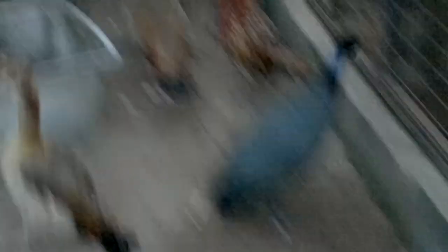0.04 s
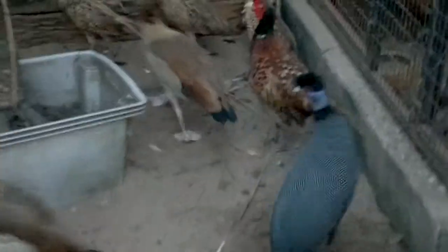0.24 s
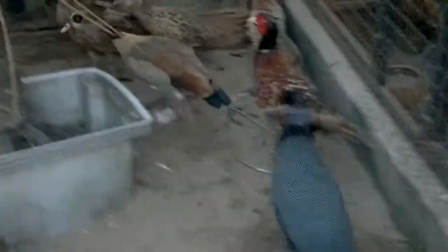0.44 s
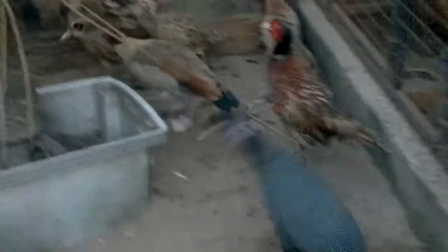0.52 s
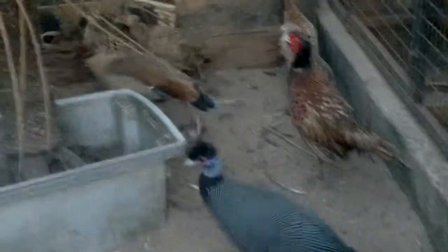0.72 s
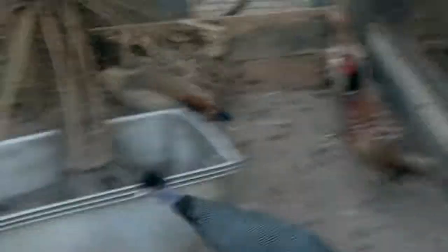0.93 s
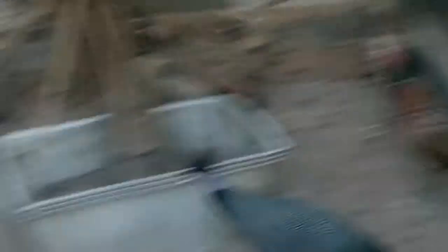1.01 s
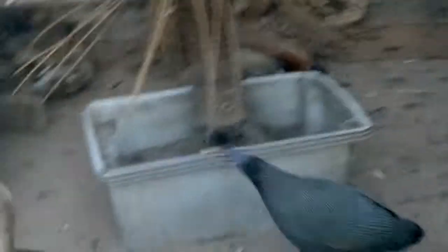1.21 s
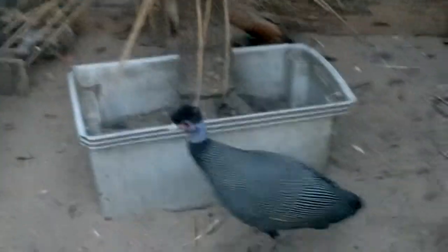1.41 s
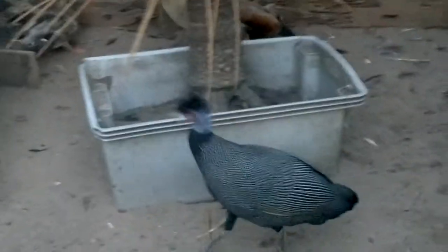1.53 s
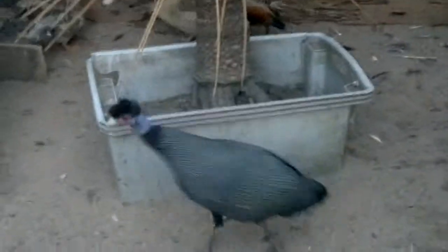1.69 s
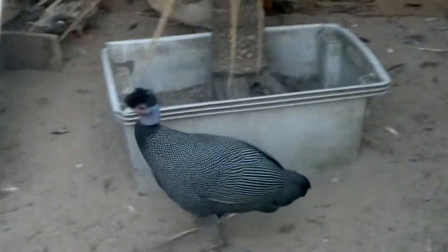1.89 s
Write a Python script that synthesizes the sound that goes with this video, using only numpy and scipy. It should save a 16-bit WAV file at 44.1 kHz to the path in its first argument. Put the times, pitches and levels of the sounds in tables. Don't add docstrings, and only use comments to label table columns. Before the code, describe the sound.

A fowl gives four harsh, buzzing squawks close on the right, with hoarse birds croaking between.

```python
import sys
import numpy as np
from scipy import signal
from scipy.fft import rfft, irfft
from scipy.io import wavfile
from scipy.ndimage import uniform_filter1d, map_coordinates

SR = 44100
rng = np.random.default_rng(int(sys.argv[2]) if len(sys.argv) > 2 else 0)


def unload_wav(signal):
    wavfile.write(
        sys.argv[1],
        SR,
        np.round(np.clip(np.atleast_2d(signal).T, -1, 1) * 32767).astype(np.int16),
    )


def volts_from_db(level):
    exponent = np.asarray(level, float) / 20
    return 10 ** exponent


N = 85995

# frequency in Hz, level in dB.
HOARSE_THROAT = [(900, -40), (1500, -12), (2100, -1), (3100, -1), (4150, 2), (6100, -8), (8000, -18),
                 (12000, -46)]


def unit(x):
    return x / np.sqrt(np.mean(x ** 2) + 1e-20)


def along(points, hz):
    f, v = np.transpose(points)
    return np.interp(np.log(hz + 1), np.log(f + 1), v)


def wobble(rate, n=N):
    knots = rng.standard_normal(int(n * rate / SR) + 4)
    return map_coordinates(knots, [np.arange(n) * rate / SR])


def colour_noise(spectrum, n):
    return irfft(rfft(rng.standard_normal(n)) * volts_from_db(along(spectrum, np.fft.rfftfreq(n, 1 / SR))), n)


def voice(calls, throat, sag, arch, release_s, trill_hz, trill, pulse_db, jitter, half_db, half_grows_db,
          breath_db, count, swell_db=7.5, chop_depth=0.63, scatter_db=2.5, tires=False):
    bend = .6
    onset_s, chop_s = 0.0015, .0013
    out = np.zeros(N + 2 * SR)
    for s, length, db, hz, attack in calls:
        n = round(length * SR) + SR // 6
        t = np.arange(n) / SR
        u = np.minimum(t / length, 1.3)

        flutter_hz = trill_hz * (1 - tires * .2 * u + 0.075 * wobble(42.7, n))
        flutter = np.cumsum(flutter_hz) / SR % 1
        saw = uniform_filter1d(flutter ** bend - 1 / (1 + bend), size=90)

        glide = 1 - sag * u - arch * (2 * u - 1) ** 2
        ends = .025 * np.exp(-t / .006) + .03 * np.clip(10 * u - 9, 0, 1)
        f = hz * (glide + trill * saw * (1 - .45 * u) - tires * ends + jitter * wobble(354.1, n))
        phase = np.pi * np.cumsum(f) / SR

        swell = -swell_db * np.maximum(1 - t / attack, 0) ** 2.86
        effort_db = swell - 20 / np.log(10) * np.maximum(t - length, 0) / release_s
        dull_db = np.minimum(-0.9 * effort_db / 20, 3)

        split_db = half_db + half_grows_db * np.clip((u - .35) / .15, 0, 1)
        tone = np.zeros(n)
        for k in range(1, count):
            half = split_db + tires * (11.5 * s + 1.6 * k)
            level_db = along(throat, k * f / 2) + k % 2 * half - k * dull_db + scatter_db * wobble(154.7, n)
            tone += volts_from_db(level_db) * (k * f < SR * .7) * np.sin(k * phase + 7 * rng.random())
        tone /= np.std(tone[:round(length * SR)])
        breath = volts_from_db(breath_db - 1.7 * dull_db) * unit(colour_noise(throat, n))

        from_break_s = np.minimum(flutter, 1 - flutter) / trill_hz
        chop = 1 - np.clip(chop_depth, 0, 1) * np.exp(-(from_break_s / chop_s) ** 2)
        shape = chop * np.minimum(t / onset_s, 1) * volts_from_db(effort_db)
        out[SR + round(s * SR):][:n] += volts_from_db(db + pulse_db * saw) * shape * (tone + breath)
    return out[SR - SR // 4:SR + N]


def pen(x, left, right, wet_left_db, wet_right_db):
    # frequency in Hz, time to fall by 60 dB in seconds.
    ring_times = [(300, 0.048), (2000, 0.29), (4200, 0.25), (7000, 0.21), (12000, 0.16)]
    hz, t, z = signal.stft(rng.standard_normal((2, SR // 2)), SR, nperseg=256)
    fading = z * volts_from_db(-60 * t / along(ring_times, hz)[:, None])
    tail = signal.istft(fading, SR, nperseg=256)[1]
    tail = tail / np.linalg.norm(tail[0])
    late = np.pad(x, (150, 0))[None]
    wet = signal.fftconvolve(late, tail, axes=1)[:, :len(x)]
    return (np.outer([left, right], x) + volts_from_db([[wet_left_db], [wet_right_db]]) * wet)[:, -N:]


def walls(x):
    # delay in seconds, level in dB.
    echoes = [(.0031, -13), (.0058, -12), (.0092, -14), (.0162, -13), (.023, -16)]
    return x + sum(volts_from_db(db) * np.pad(x, (round(s * SR), 0))[:len(x)] for s, db in echoes)


def valley(x):
    hz = np.fft.rfftfreq(len(x), 1 / SR)
    dip_db = -24 * np.exp(-((hz - 2720) / 200) ** 2)
    return irfft(rfft(x) * volts_from_db(dip_db), len(x))


def fowl():
    # start in seconds, length in seconds, level in dB, pitch in Hz, attack in seconds.
    squawk_calls = [
        (.199, 0.15, -16.5, 2243, 0.1176),
        (.548, .18, -16.5, 2227, 0.065),
        (.775, 0.034, -24.5, 2185, 0.0065),
        (.992, 0.13755, -14.5, 2183, 0.056),
        (1.484, 0.15, -15.5, 2166, 0.022),
    ]
    # start in seconds, length in seconds, level in dB, pitch in Hz, attack in seconds.
    chip_calls = [(.161, 0.074, -34, 1969, 0.00186), (.186, 0.0087, -30.5, 1728, 0.00215),
                  (.199, 0.0053, -25, 1863, .002), (.345, 0.0412, -32.5, 1778, .004),
                  (.522, 0.016, -54, 2000, 0.0021), (.536, 0.0086, -28.5, 1950, 0.00184),
                  (.975, 0.03, -44, 1865, 0.009), (.991, 0.0067, -23.5, 2086, 0.00189),
                  (1.465, 0.01, -41, 2474, 0.0067), (1.479, 0.013, -26.5, 2133, .003)]
    # frequency in Hz, level in dB.
    fowl_throat = [(1100, -30), (2150, -15.5), (3200, 2.5), (4200, 3), (6300, -7), (8000, -16.5),
                   (10500, -27), (14500, -50)]
    squawk = voice(squawk_calls, fowl_throat, sag=.055, arch=.015, release_s=.02, trill_hz=80, trill=.17,
                   pulse_db=4, jitter=.014, half_db=-68, half_grows_db=30, breath_db=-33, count=15,
                   chop_depth=.85, scatter_db=2.8, tires=True)
    chip = voice(chip_calls, fowl_throat, sag=.03, arch=.01, release_s=.005, trill_hz=90, trill=.04,
                 pulse_db=3, jitter=.03, half_db=-10, half_grows_db=.1, breath_db=-1, count=12)
    return pen(walls(valley(squawk)) + chip, left=0.1, right=1.185, wet_left_db=-10.5, wet_right_db=-5)


def neighbour():
    # start in seconds, length in seconds, level in dB, pitch in Hz, attack in seconds.
    rasp_calls = [
        (.4, 0.068, -37.5, 987, 0.0057),
        (1.13, 0.0518, -30, 1018, 0.007),
        (1.61, 0.075, -28.5, 1013, 0.0263),
    ]
    # start in seconds, length in seconds, level in dB, pitch in Hz, attack in seconds.
    gasp_calls = [
        (1.356, 0.0528, -30, 1042, 0.025),
        (1.85, 0.0482, -24.5, 1048, 0.062),
    ]
    # frequency in Hz, level in dB.
    gasp_throat = [(900, -40), (1500, -16), (2100, -8), (3100, 3), (4200, 3), (5200, -8), (8000, -16),
                   (12000, -46)]
    rasp = voice(rasp_calls, HOARSE_THROAT, sag=.03, arch=.04, release_s=.012, trill_hz=145, trill=.03,
                 pulse_db=8, jitter=.02, half_db=-13, half_grows_db=.1, breath_db=-6, count=22,
                 swell_db=28, chop_depth=.8)
    gasp = voice(gasp_calls, gasp_throat, sag=.02, arch=.02, release_s=.006, trill_hz=145, trill=.03,
                 pulse_db=6, jitter=.015, half_db=-18, half_grows_db=.1, breath_db=-8, count=22,
                 swell_db=22, chop_depth=.9)
    return (pen(rasp, left=-1.05, right=1.45, wet_left_db=-11, wet_right_db=-9)
            + pen(gasp, left=-.9, right=1.5, wet_left_db=-15, wet_right_db=-13))


def croaker():
    # start in seconds, length in seconds, level in dB, pitch in Hz, attack in seconds.
    croak_calls = [
        (.03, 0.055, -31, 1029, 0.006),
        (.6, 0.21, -30, 1047, 0.068),
        (.72, .1, -34.5, 1419, 0.06),
        (.82, 0.069, -33.5, 1023, 0.013),
    ]
    croak = voice(croak_calls, HOARSE_THROAT, sag=.03, arch=.04, release_s=.007, trill_hz=130, trill=.04,
                  pulse_db=8, jitter=.025, half_db=-9, half_grows_db=.1, breath_db=-4, count=22,
                  swell_db=20, chop_depth=.85)
    return pen(croak, left=-.35, right=1.7, wet_left_db=-12, wet_right_db=-11)


def whistle():
    # start in seconds, length in seconds, level in dB, pitch in Hz, attack in seconds.
    slide_calls = [
        (.705, 0.11, -28, 3720, 0.0082),
    ]
    # frequency in Hz, level in dB.
    pipe_throat = [(1500, -46), (2800, -0.5), (6000, 1.5), (9000, -15.5), (14000, -25)]
    slide = voice(slide_calls, pipe_throat, sag=.24, arch=-0.0393, release_s=0.0053, trill_hz=55.6,
                  trill=0.031, pulse_db=5, jitter=0.036, half_db=-40, half_grows_db=.1, breath_db=-7,
                  swell_db=14, count=8, chop_depth=.7)
    return pen(slide, left=0.17, right=1.6, wet_left_db=-6.5, wet_right_db=-1.0)


def yelper():
    # start in seconds, length in seconds, level in dB, pitch in Hz, attack in seconds.
    yelp_calls = [
        (-.04, .074, -33, 1180, .01),
    ]
    # frequency in Hz, level in dB.
    yelp_throat = [(600, -50), (1200, -30), (2400, 1), (3600, -4), (4700, 3), (5900, -6), (12000, -24)]
    yelp = voice(yelp_calls, yelp_throat, sag=.02, arch=.002, release_s=.01, trill_hz=110, trill=.03,
                 pulse_db=4, jitter=.015, half_db=-20, half_grows_db=.1, breath_db=-7, count=14,
                 chop_depth=.6)
    return pen(yelp, left=0.2, right=1.793, wet_left_db=-9, wet_right_db=-9)


def chick():
    # start in seconds, length in seconds, level in dB, top pitch in Hz, attack in seconds.
    peep_calls = [
        (.43, 0.036, -45, 1223, 0.0037),
        (1.16, 0.03, -42, 1188, 0.0099),
        (1.53, 0.0615, -42.5, 1174, 0.01),
    ]
    # frequency in Hz, level in dB.
    chick_throat = [(600, -78), (1200, -3), (2400, 0.5), (3600, 2.5), (4700, -2), (5900, -7),
                    (12000, -11.5)]
    peep = voice(peep_calls, chick_throat, sag=0.0285, arch=0.0856, release_s=0.0068, trill_hz=56.6,
                 trill=0.0038, pulse_db=11.0, jitter=0.0014, half_db=-60, half_grows_db=.1,
                 breath_db=-14, count=14)
    return pen(peep, left=0.67, right=2.0, wet_left_db=-10, wet_right_db=2.0)


def hen():
    # start in seconds, length in seconds, level in dB, top pitch in Hz, attack in seconds.
    cluck_calls = [(.14, 0.0395, -51, 547, 0.0053), (.435, 0.031, -55, 550, 0.0031),
                   (.7, 0.032, -57.5, 533, 0.0087), (.79, 0.045, -55.5, 397, 0.014),
                   (.997, 0.039, -53, 565, 0.0041), (1.34, 0.02644, -54.5, 580.4, 0.063),
                   (1.485, 0.016, -53, 502, 0.033), (1.72, 0.14, -64, 572, 0.011)]
    # frequency in Hz, level in dB.
    hen_throat = [(150, -40), (350, -20), (550, 11.5), (800, -3), (1150, -3), (2000, 9.5), (4000, -83)]
    cluck = voice(cluck_calls, hen_throat, sag=0.011, arch=0.1193, release_s=0.013, trill_hz=54.8,
                  trill=0.081, pulse_db=11.5, jitter=0.0305, half_db=-58, half_grows_db=-22.0,
                  breath_db=-1, count=10)
    return pen(cluck, left=0.36, right=2.02, wet_left_db=-3.5, wet_right_db=7.0)


def ticks():
    # start in seconds, level in dB, frequency in Hz above which the tick is dull.
    floor_ticks = [
        (0.08, -27.5, 10800),
        (0.322, -38, 925),
        (0.847, -53, 700),
        (1.051, -54, 910),
        (1.076, -37, 920),
        (1.102, -49, 920),
    ]
    x, t = np.zeros(N), np.arange(400) / SR
    for s, db, hz in floor_ticks:
        b, a = signal.butter(2, min(hz, 15000), fs=SR)
        grit = unit(signal.lfilter(b, a, rng.standard_normal(400)))
        x[round(s * SR):][:400] += volts_from_db(db - 60 * t / 0.00532) * grit
    return np.outer([.3, 1.7], x)


def rush(spectrum, alike, left_db):
    a, b = colour_noise(spectrum, N), colour_noise(spectrum, N)
    left = unit(alike * a + np.sqrt(1 - alike ** 2) * b)
    return np.array([volts_from_db(left_db) * left, unit(a)])


def handling():
    # time in seconds, level in dB.
    handling_levels = [(0.0, -45.5), (0.114, -45), (0.156, -36), (0.346, -62), (0.428, -61), (0.554, -45.5),
                       (0.662, -66), (0.754, -46.5), (0.83, -43), (0.858, -70), (0.89, -74), (0.95, -48),
                       (1.102, -65), (1.45, -53.5), (1.466, -45.5), (1.666, -68.5), (1.922, -56.5),
                       (1.95, -47)]
    # frequency in Hz, level in dB.
    rumble_colour = [(12, -11), (20, 7.5), (98, 8), (253, -14), (339, -6), (406, -54), (537, -36),
                     (1000, -29), (1300, -83), (2200, -120)]
    level_db = np.interp(np.arange(N) / SR, *np.transpose(handling_levels)) + 4
    return volts_from_db(level_db + 2.5 * wobble(30)) * rush(rumble_colour, alike=.93, left_db=-15)


def air():
    # frequency in Hz, level in dB.
    hiss_colour = [(3000, -61.5), (6000, 1), (9000, -3), (12000, -9), (15000, -25.5)]
    # frequency in Hz, level in dB.
    air_colour = [(200, -12), (600, -12), (1100, -24), (2200, -18), (4200, -19), (6000, -32), (10000, -48),
                  (15000, -66)]
    t = np.arange(N) / SR
    fade_s = 0.21
    hiss = volts_from_db(-54.5 - 9 * t / fade_s) * rush(hiss_colour, alike=0.39, left_db=0.5)
    air_db = -55.5 + 6.5 * np.exp(-t / fade_s) + 1.6 * wobble(12.7) + 0.2 * wobble(40.5)
    return hiss + volts_from_db(air_db) * rush(air_colour, alike=0.72, left_db=-9.5)


def scene():
    birds = fowl() + neighbour() + croaker() + whistle() + yelper() + chick() + hen()
    return birds + ticks() + handling() + air()


def roll_off(x):
    return signal.sosfilt(signal.butter(12, 15660, fs=SR, output="sos"), x)


def record(dry):
    passed = np.fft.rfftfreq(N, 1 / SR) < 15600
    return roll_off(irfft(rfft(dry) * passed, N))


dry = scene()
out = record(dry)
unload_wav(out)
```